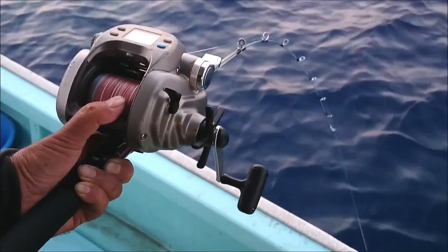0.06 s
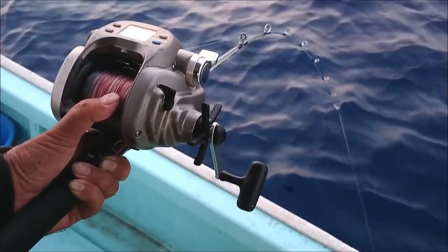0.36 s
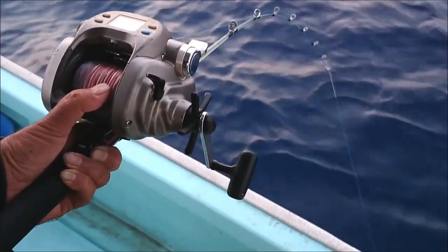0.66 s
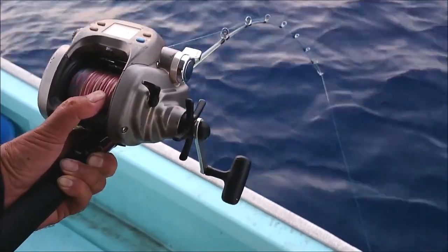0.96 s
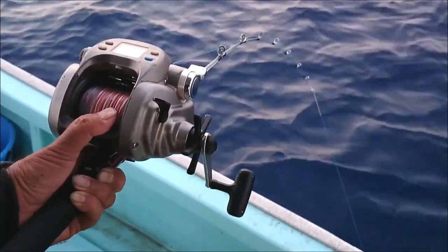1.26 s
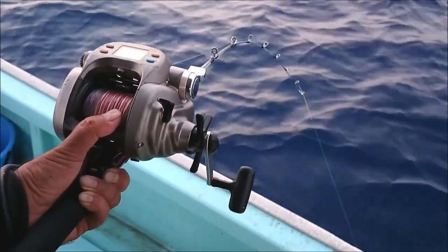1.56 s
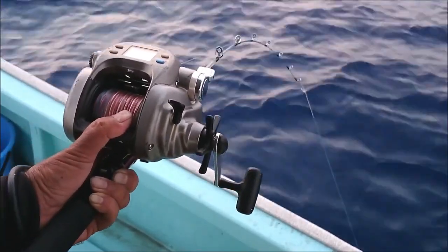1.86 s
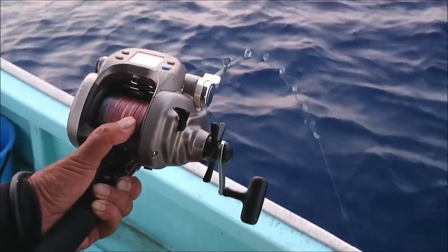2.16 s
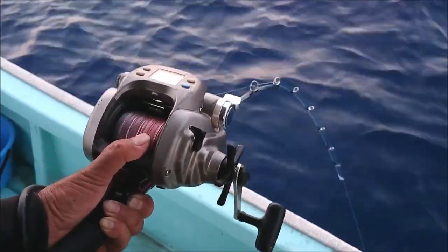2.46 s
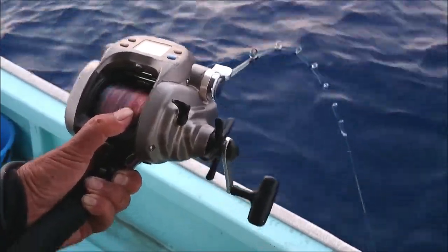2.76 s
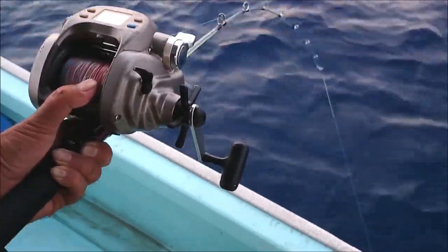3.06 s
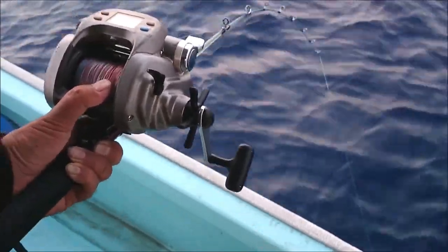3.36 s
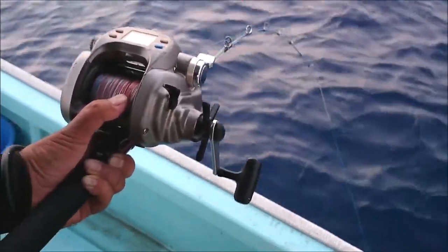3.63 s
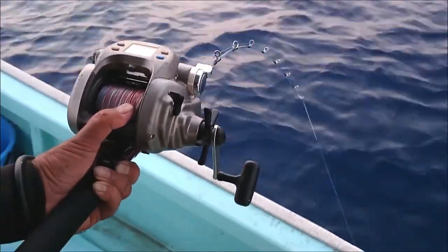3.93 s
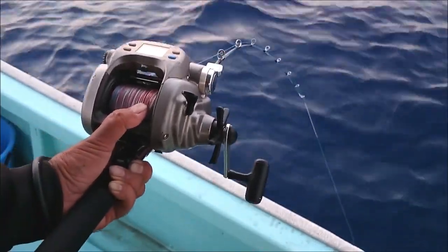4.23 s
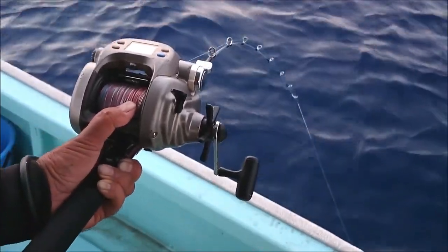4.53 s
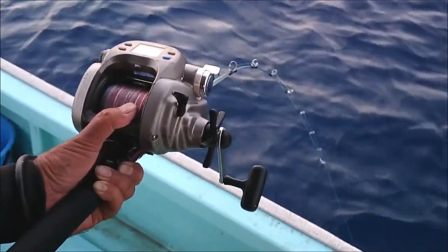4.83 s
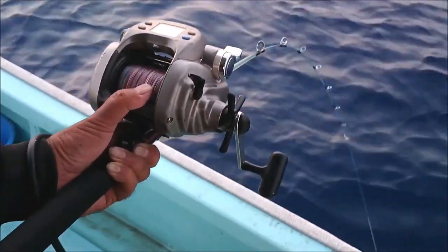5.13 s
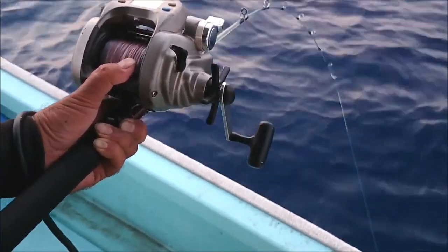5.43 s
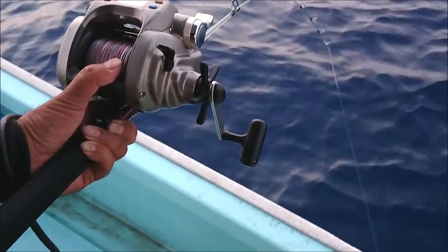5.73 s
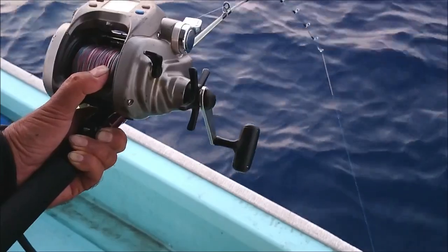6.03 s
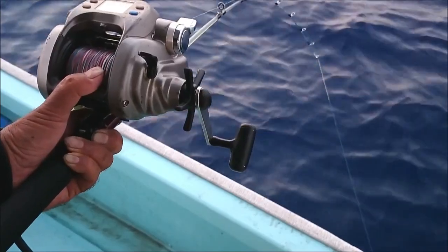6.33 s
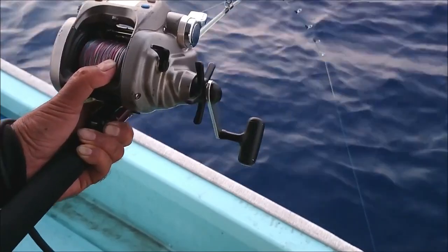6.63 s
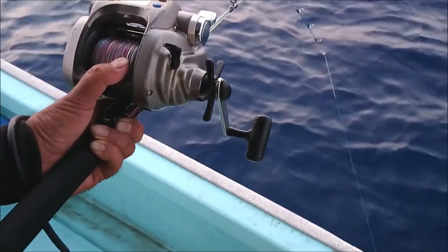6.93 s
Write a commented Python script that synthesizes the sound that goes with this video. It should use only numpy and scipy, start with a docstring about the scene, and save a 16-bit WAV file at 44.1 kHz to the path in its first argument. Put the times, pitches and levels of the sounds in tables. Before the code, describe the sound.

An electric fishing reel whines and rattles in three short bursts near the microphone, a couple of seconds apart. Each starts abruptly, holds briefly with a slight screech and coasts to a stop. Much quieter sounds fill the pauses: water sloshing and gurgling at the side of a drifting boat, low wind rumble, scattered ticks from the spool and very faint, thin squeaks of the taut line.

```python
"""An electric fishing reel runs close by on a small boat drifting at sea. Its motor spins up at once,
holds and coasts down; tooth impacts and meshing tones excite the housing, which whines and rattles.
Beneath it, turbulent wind rumbles on the microphone and waves slop against the hull. As the first run
dies away, trapped air glugs and the taut line squeaks faintly by friction. The spool ticks at rest,
and the motor runs twice more, near 2.2 s and 4.7 s, each time giving way to water, ticks and squeaks."""
import sys
import numpy as np
from scipy import signal
from scipy.fft import rfft, irfft, next_fast_len
from scipy.io import wavfile

SR = 44100
rng = np.random.default_rng(int(sys.argv[2]) if len(sys.argv) > 2 else 0)


def digitize_waveform(pressure):
    """Quantize a signal to 16-bit integers and store it at the path in sys.argv[1].

    Rows of a 2-D input are taken as channels; values are limited to [-1, 1].
    """
    field = np.atleast_2d(pressure).T
    bounded = np.clip(field, -1, 1)
    quanta = np.round(bounded * 32767).astype(np.int16)
    wavfile.write(sys.argv[1], SR, quanta)


N = 317079
TIME = np.arange(N) / SR
SIZE = next_fast_len(N, real=True)
FREQS = np.maximum(np.arange(SIZE // 2 + 1) * SR / SIZE, 1)
OPPOSED = np.array([[1], [-1]])   # left and right with opposite signs


def from_db(db):
    """Amplitude ratio of a level in decibels."""
    return 10 ** (np.asarray(db) / 20)


def rms_one(x):
    """Normalisation to unit rms."""
    return x / np.sqrt(np.mean(x ** 2) + 1e-20)


def response_db(points):
    """Frequency response: (frequency [Hz], level [dB]) points joined on a logarithmic axis."""
    hz, db = np.transpose(points)
    return np.interp(np.log(FREQS), np.log(hz), db)


def filtered(x, gain):
    """Linear filtering: the spectrum is multiplied by a gain at each frequency."""
    return irfft(rfft(x, SIZE) * gain, SIZE)[..., :N]


def colour(x, points):
    """Spectral shaping to a frequency response, at unit rms."""
    return rms_one(filtered(x, from_db(response_db(points))))


def drift(rate_hz):
    """Random modulation of unit rms, mostly below the given rate."""
    knots = rng.standard_normal(9000)
    return rms_one(np.interp(TIME * rate_hz * 2, np.arange(len(knots)), knots))


def spread(mid, side, correlation):
    """Partial coherence: the sum and difference of two independent signals form a stereo pair."""
    return np.sqrt((1 + correlation) / 2) * mid + np.sqrt((1 - correlation) / 2) * side * OPPOSED


def pan(x, left_db):
    """Interaural level difference, left minus right."""
    return x * from_db(left_db / 2 * OPPOSED)


def add(track, start_s, sound):
    """Superposition of a short sound on a track."""
    i = max(int(start_s * SR), 0)
    track[i:i + len(sound)] += sound[:N - i]


def surges(rows, calm_db):
    """Incoherent addition: exponential swells and a calm floor sum in power."""
    power = from_db(calm_db) ** 2
    for crest_s, rise_s, fall_s, db in rows:
        age = TIME - crest_s
        swell = np.exp(-np.maximum(-age / rise_s, age / fall_s))
        power += (from_db(db) * swell) ** 2
    return np.sqrt(power)


TOP_TURNS_PER_S = 288.6
# Runs of the motor: (switch-on time [s], switch-off time [s], gear level [dB], driven whine gain [dB])
MOTOR_RUNS = [(-0.008, .222, -22.5, 0), (2.228, 2.72, -22.9, 4.3), (4.728, 5.246, -22.2, 2.2)]
def motor_run(spin_up_s=.049, drag_s=.62, friction_turns_per_s2=306, crawl_turns_per_s=21, engage_s=.009):
    """First-order motion: the motor nears top speed, then viscous grease and dry friction stop it."""
    speed, powered, level, whine_gain = np.zeros((4, N))
    friction = friction_turns_per_s2 * drag_s
    for on_s, off_s, gear_db, whine_db in MOTOR_RUNS:
        age = np.maximum(TIME - on_s, 0)
        reached = TOP_TURNS_PER_S * (1 - np.exp(-np.minimum(age, off_s - on_s) / spin_up_s))
        drag = np.exp(-np.maximum(TIME - off_s, 0) / drag_s)
        run = np.maximum((reached + friction) * drag - friction, 0)
        # gear noise follows a power of the speed and dies away below a crawl
        loudness = (run / TOP_TURNS_PER_S) ** 1.194 * np.tanh(run / crawl_turns_per_s)
        contact = 1 - np.exp(-age / engage_s)
        speed += run
        powered += (TIME > on_s) & (TIME < off_s)
        level += from_db(gear_db) * loudness * contact
        whine_gain += (run > 0) * from_db(whine_db)
    return speed, powered, level, whine_gain


def tooth_clatter(turns, uneven_db, scrape, teeth=9):
    """Impact train: pinion teeth land with uneven timing and force, and their flanks scrape."""
    hits = np.flatnonzero(np.diff(np.floor(turns * teeth)) > 0)
    gaps = np.gradient(hits)
    late = (rng.random(N)[hits] * np.minimum(gaps, SR / 100)).astype(int)
    force = from_db(uneven_db * np.clip(rng.standard_normal(N)[hits], -2, 2))
    force *= rng.choice([-1, 1], N)[hits]
    clicks = np.zeros(N)
    # slow teeth land further apart, so each carries more of the sound
    clicks[np.minimum(hits + late, N - 1)] = rms_one(force) * np.sqrt(np.minimum(gaps, SR / 1000))
    return clicks + scrape * rng.standard_normal(N)


# Worn reduction wheels: (speed ratio [turns per motor turn], relative level [dB])
WORN_WHEELS = [(0.47, -9), (.1631, -8)]
def worn_teeth(turns):
    """Periodic excitation: each wheel's rough profile repeats once a turn, a buzz that follows speed."""
    buzz = np.zeros(N)
    for ratio, db in WORN_WHEELS:
        bumps = int(120 / ratio)
        profile = signal.resample(rng.standard_normal(2000)[:bumps], 8 * bumps)
        position = np.linspace(0, 1, len(profile), endpoint=False)
        buzz += from_db(db) * np.interp(turns * ratio, position, profile, period=1)
    return buzz


MAIN_MESH = 18.48   # cycles per motor turn
# Shaft and mesh tones: (order [cycles per motor turn], driven level [dB], coasting level [dB])
GEAR_ORDERS = [(1, -18, -28), (2.97, -25, -25), (3.47, -23, -23), (4.894, -18.5, -16.5),
               (6.94, -23.5, -21.5), (8, -24.5, -23), (8.98, -18.5, -13), (9.16, -25, -21),
               (9.79, -23, -25), (10, -16.5, -26), (14.68, -17.5, -19), (MAIN_MESH, -12.5, -14.5),
               (18.98, -21, -25), (19.6, -21.5, -24), (22.8, -28, -24), (24.5, -32, -15),
               (27.45, -27, -13.5), (37.05, -27, -17.5)]
def gear_whine(turns, pace, grip, whine_gain, mesh_lift_db, waver_db=3.5, slip_rad=.33, loose_db=.5):
    """Rotational orders: tones locked to the motor, bright under drive, raspy and dull when loose."""
    driven, coasting = np.zeros((2, 2, N))
    backlash_rad = .48 * np.clip(7 * (1 - pace), 0, 1)   # the teeth rattle below full speed
    for order, driven_db, coasting_db in GEAR_ORDERS:
        phase = 2 * np.pi * order * turns + slip_rad * drift(65) + backlash_rad * drift(220)
        right_lag_s = .00015 if order >= MAIN_MESH else .0001   # the fast gears lie on the left
        phase = phase - 2 * np.pi * order * pace * TOP_TURNS_PER_S * np.array([[0], [right_lag_s]])
        amplitude = np.sqrt(2) * from_db(waver_db * drift(25) + mesh_lift_db * (order == MAIN_MESH))
        sway_rad = .5 * drift(3) * OPPOSED   # the reel moves in the hand
        driven += from_db(driven_db) * amplitude * np.sin(phase + sway_rad)
        coasting += from_db(coasting_db) * amplitude * np.sin(phase)
    band = signal.butter(2, [750, 3900], "band", fs=SR, output="sos")
    return whine_gain * grip * driven + from_db(loose_db) * (1 - grip) * signal.sosfilt(band, coasting)


# Broad response of the housing: (frequency [Hz], relative level [dB])
HOUSING_RESPONSE = [(40, -21), (130, -21), (280, -21), (520, -25), (1200, -15.5), (1800, -8), (2400, -6),
                    (3500, -1.5), (4800, 5.5), (6300, 7), (7300, 0.5), (8500, 3.5), (10500, 2.5),
                    (12200, -4.5), (15000, 2.5)]
# Its resonances: (frequency [Hz], bandwidth [Hz], gain [dB])
HOUSING_RESONANCES = [(765, 83, 10.5), (1900, 200, 0.5), (2840, 1200, 6), (4525, 280, -5), (5800, 480, 7.5)]
# Its balance between the ears: (frequency [Hz], left minus right level [dB])
HOUSING_BALANCE = [(300, 1), (1300, -3.5), (2400, -0.5), (5000, -0.35), (8000, 1), (14000, 1)]
def housing(vibration):
    """Forced vibration: the housing radiates the gear noise through its resonances."""
    modes_db = sum(db / (1 + (2 * (FREQS - hz) / width) ** 2) for hz, width, db in HOUSING_RESONANCES)
    gain = rms_one(from_db(response_db(HOUSING_RESPONSE) + modes_db))
    return filtered(vibration, pan(gain, left_db=response_db(HOUSING_BALANCE)))


def lingering_tail(level, tail_db=-22.5, decay_s=.11):
    """Exponential decay: the sound lingers briefly as the gears stop, adding a tail to their envelope."""
    pole = np.exp(-1 / (decay_s * SR))
    return level + from_db(tail_db) * signal.lfilter([1 - pole], [1, -pole], level)


# Hard pulls on the line: (time [s], half width [s], screech level [dB], mesh tone gain [dB])
LINE_PULLS = [(.2, .055, -8, 5), (2.41, .04, -17, 1), (2.735, .055, -14, 4.5), (5.232, .06, -11, 8)]
def line_pulls():
    """Transient loading: each pull strains the main mesh in a Gaussian pulse and lifts its tone."""
    strain, mesh_lift_db = np.zeros((2, N))
    for time_s, half_s, screech_db, lift_db in LINE_PULLS:
        pull = np.exp(-((TIME - time_s) / half_s) ** 2)
        strain += from_db(screech_db) * pull
        mesh_lift_db += lift_db * pull
    return strain, mesh_lift_db


def screech(turns, rasp_hz=330):
    """Modulation sidebands: hard-pressed teeth chatter, smearing their tone into a rough band."""
    lowpass = signal.butter(2, rasp_hz, fs=SR, output="sos")
    chatter = signal.sosfilt(lowpass, rng.standard_normal((2, N)))
    phase = 2 * np.pi * MAIN_MESH * turns
    return rms_one(chatter[0] * np.sin(phase) + chatter[1] * np.cos(phase))


def reel(judder_db=.39, right_lag_s=.00017, growl_hz=2200):
    """Structure-borne sound: clatter, buzz and whine of the gear train sum and pass into the housing."""
    speed, powered, level, whine_gain = motor_run()
    strain, mesh_lift_db = line_pulls()
    turns, pace = np.cumsum(speed) / SR, speed / TOP_TURNS_PER_S
    # the teeth stay pressed together for a moment after the power is cut
    grip = signal.lfilter(*signal.butter(1, 3, fs=SR), powered) * pace ** 4
    judder = from_db(judder_db * drift(170)) * (1 + .55 * strain)
    pinion = from_db(-10) * tooth_clatter(turns, uneven_db=2.5, scrape=.33)
    motor = judder * (pinion + worn_teeth(turns)) + strain * screech(turns)
    # the motor lies to the left, the spool straight ahead
    motor = filtered(motor, np.exp(-2j * np.pi * FREQS * np.array([[0], [right_lag_s]])))
    whine = gear_whine(turns, pace, grip, whine_gain, mesh_lift_db)
    spool = from_db(-8) * tooth_clatter(turns, uneven_db=5, scrape=1)
    deck_scatter = from_db(-7) * rng.standard_normal((2, N))
    gears = motor + whine + judder * (spool + deck_scatter)
    # slow teeth land softly, so the sound grows duller as the motor runs down
    growl = signal.sosfilt(signal.butter(1, growl_hz, fs=SR, output="sos"), gears)
    return from_db(.17) * lingering_tail(level) * housing(gears + 1.5 * (1 - pace) * growl)


# Spectrum of the wind: (frequency [Hz], relative level [dB])
WIND_SPECTRUM = [(12, 4.5), (30, 0), (50, -11), (100, -16), (200, -29.5), (500, -55.5)]
# Gusts: (crest time [s], rise time [s], fall time [s], level [dB])
WIND_GUSTS = [(.04, 0.28, 0.16, -42.5), (1.67, .03, 0.098, -56), (2.95, 0.065, 0.1, -53.5),
              (3.33, 0.083, 0.51, -48.5), (4.37, .04, 0.054, -54), (5.42, 0.11, 0.09, -52)]
def wind(lumpy_db=2.5):
    """Turbulence: fluctuating pressure on the microphone rumbles, more strongly on the right."""
    rumble = colour(spread(*rng.standard_normal((2, N)), correlation=.5), WIND_SPECTRUM)
    level = surges(WIND_GUSTS, calm_db=-61.5) * from_db(lumpy_db * drift(4))
    return pan(rumble * level, left_db=-12)


# Spectrum of the distant water: (frequency [Hz], relative level [dB])
OPEN_SEA_SPECTRUM = [(71, -24.5), (120, 1), (350, -18.5), (403, -10), (887, -17.5), (1020, -19.5),
                     (1950, -19), (2750, -19), (15000, -27)]
def open_sea():
    """Diffuse field: the open sea is a steady hiss, uncorrelated between the ears."""
    hiss = colour(rng.standard_normal((2, N)), OPEN_SEA_SPECTRUM)
    return pan(from_db(-70) * hiss, left_db=-.25)


def bubble(hz, length_s, rise):
    """Bubble resonance: an air pocket swells, rings and rises in pitch as it decays."""
    age = np.arange(int(3 * length_s * SR)) / SR / length_s
    envelope = (3 * age) ** 2 * np.exp(2 - 6 * age)
    return envelope * np.sin(2 * np.pi * hz * length_s * (age + rise * age ** 2 / 2))


def gurgle(cycles, range_db, count=1100):
    """Random superposition: short-lived bubbles of all sizes ring across four octaves."""
    crowd = np.zeros(N)
    for when, pitch, strength in rng.random((count, 3)):
        hz = 150 * 16 ** pitch
        add(crowd, when * TIME[-1], from_db(range_db * strength) * hz * bubble(hz, cycles / hz, rise=.15))
    return rms_one(crowd)


# Spectrum of the slosh: (frequency [Hz], relative level [dB])
SLOSH_SPECTRUM = [(70, -15), (150, -3), (300, 5), (500, 1.5), (800, -2.5), (1200, -15), (2500, -19.5),
                  (6000, -37.5)]
# Spectrum of the spray: (frequency [Hz], relative level [dB])
SPRAY_SPECTRUM = [(500, -9), (1000, 5), (2500, -5.5), (5500, -3), (9000, -20), (15000, -21.5)]
# Waves at the hull: (crest time [s], rise time [s], fall time [s], slosh level [dB], spray level [dB])
HULL_WAVES = [(.03, 0.15, .2, -52.5, -69), (.77, 0.025, .04, -58.5, -68), (1.44, 0.047, .06, -68.5, -82),
              (1.68, 0.059, .08, -57.5, -73), (2.146, 0.012, 0.038, -49, -65),
              (2.58, 0.18, .12, -55, -66.5), (2.859, 0.11, .08, -43.5, -58), (3.381, 0.42, .11, -51, -57.5),
              (3.602, 0.04, .035, -54, -65), (4.32, 0.059, .06, -61.5, -69.5),
              (4.71, 0.029, .04, -74, -62.5), (4.89, 0.11, .14, -48.5, -59), (5.53, 0.11, .07, -50, -70),
              (5.91, .015, .14, -85, -69), (6.52, .04, .05, -75, -86), (7.13, 0.044, .1, -74, -89)]
def waves(flicker_db=2.5):
    """Amplitude modulation: each wave at the hull swells the noise of churning water and of spray."""
    bubbles = spread(gurgle(cycles=8.8, range_db=10), gurgle(cycles=4, range_db=7.5), correlation=.23)
    churn = 2.8 * spread(*rng.standard_normal((2, N)), correlation=.75)
    foam = spread(*rng.standard_normal((2, N)), correlation=.13) * from_db(flicker_db * drift(140))
    slosh_level = surges([(*timing, db) for *timing, db, _ in HULL_WAVES], calm_db=-78)
    spray_level = surges([(*timing, db) for *timing, _, db in HULL_WAVES], calm_db=-78.5)
    slosh = slosh_level * colour(bubbles + churn, SLOSH_SPECTRUM)
    spray = spray_level * colour(foam, SPRAY_SPECTRUM)
    return slosh + spray


# Air trapped at the hull: (time [s], starting frequency [Hz], relative level [dB], length [s])
AIR_POCKETS = [(0.766, 509, -58.5, 0.058), (1.655, 478, -65, .06), (1.765, 823, -61.5, 0.063),
               (2.135, 474, -57, 0.07), (2.14, 252.4, -53, 0.11), (2.15, 142, -52, 0.087),
               (2.575, 247, -40.5, 0.03), (2.833, 338, -41.5, 0.047), (2.834, 246, -42, 0.035),
               (2.838, 114.6, -46, 0.068), (3.539, 381, -47, 0.091), (4.261, 585, -60, 0.015),
               (4.709, 724, -52, 0.023), (4.818, 727, -33, 0.013), (4.866, 294, -49.5, 0.096),
               (4.98, 400, -46, 0.059), (5.888, 1077, -59.5, 0.048)]
def glugs(waver_db=3):
    """Free oscillation: single pockets of trapped air ring with a wavering level."""
    ringing = np.zeros(N)
    for time_s, hz, db, length_s in AIR_POCKETS:
        add(ringing, time_s, from_db(db) * bubble(hz, length_s, rise=.16))
    return ringing * from_db(-1 + waver_db * drift(90))


# Slides of the line in the guides: (centre time [s], top frequency [Hz], level [dB], half length [s])
LINE_SLIDES = [(.805, 7100, -79, 0.05), (.87, 8350, -71, 0.047), (0.933, 7000, -78, 0.082),
               (1.078, 6700, -74, .045), (3.34, 6800, -87, .04), (3.428, 8550, -74, 0.071),
               (3.44, 7000, -78, .035), (3.508, 6800, -72, 0.046), (3.555, 6840, -71, 0.083),
               (5.915, 6150, -75, .11), (6.02, 5660, -75, .06), (6.17, 5040, -73, 0.032)]
def line_squeaks(arch=.11, scratch_db=2):
    """Frictional vibration: the wet line sings as it slides, its pitch arching with the pull."""
    squeaks = np.zeros(N)
    wobble = 1 + .016 * drift(500)
    for centre_s, top_hz, db, half_s in LINE_SLIDES:
        span = np.flatnonzero(np.abs(TIME - centre_s) < half_s)
        progress = (TIME[span] - centre_s) / half_s   # -1 to 1
        hz = top_hz * (1 - arch * progress ** 2) * wobble[span]
        envelope = from_db(db) * np.cos(np.pi / 2 * progress)
        squeaks[span] += envelope * np.sin(2 * np.pi * np.cumsum(hz) / SR)
    return squeaks * from_db(scratch_db * drift(90))


# Ticks of the spool at rest: (time [s], relative level [dB])
SPOOL_TICKS = [(1.93, -55), (3.261, -36.5), (3.368, -57), (3.6194, -56.5), (4.461, -54), (4.665, -74),
               (5.9054, -53), (6, -52), (6.0786, -51)]
def spool_ticks(decay_s=.014):
    """Damped impacts: the spool settles against its stop in short bursts of band-limited noise."""
    ticks = np.zeros(N)
    age = np.arange(SR // 20) / SR
    for time_s, db in SPOOL_TICKS:
        add(ticks, time_s, from_db(db - 9) * np.exp(-age / decay_s) * rng.standard_normal(len(age)))
    return signal.sosfilt(signal.butter(2, [2200, 6200], "band", fs=SR, output="sos"), ticks)


def scene():
    """Linear superposition of reel, wind, water, line and spool."""
    return (reel() + wind() + open_sea() + pan(waves() + glugs(), left_db=-3)
            + line_squeaks() + spool_ticks())


def record(dry):
    """Band limiting: a steep elliptic low-pass removes the highest treble."""
    cutoff_hz = 15750
    return signal.sosfilt(signal.ellip(12, .1, 80, cutoff_hz, fs=SR, output="sos"), dry)


dry = scene()
out = record(dry)
digitize_waveform(out)
```